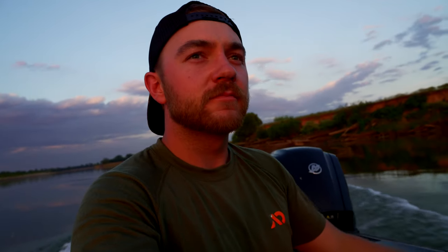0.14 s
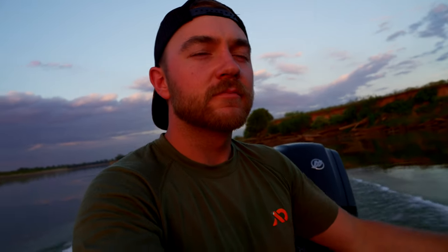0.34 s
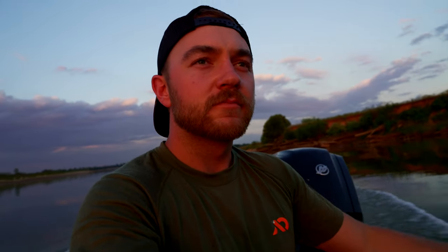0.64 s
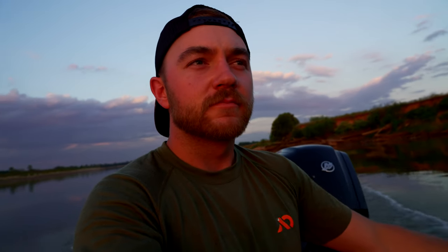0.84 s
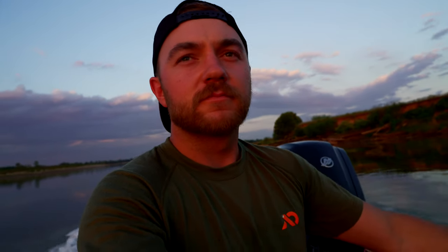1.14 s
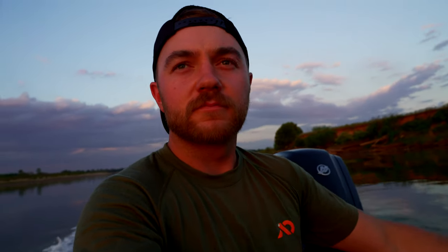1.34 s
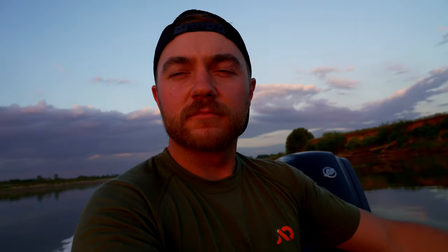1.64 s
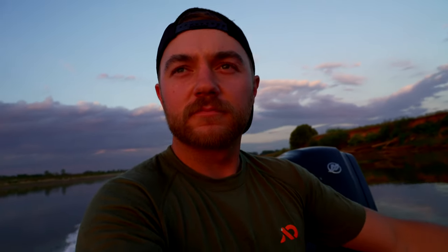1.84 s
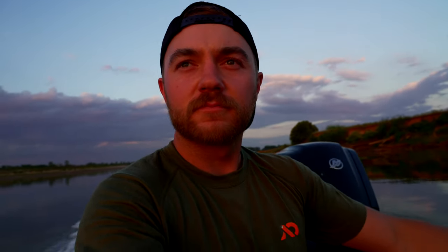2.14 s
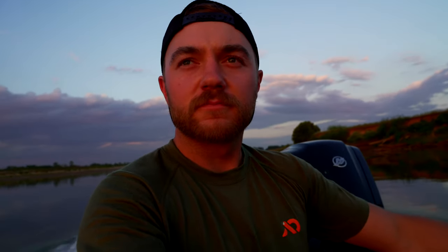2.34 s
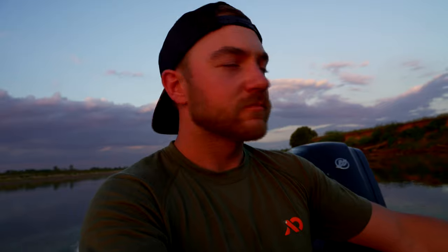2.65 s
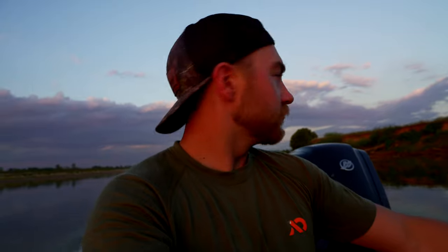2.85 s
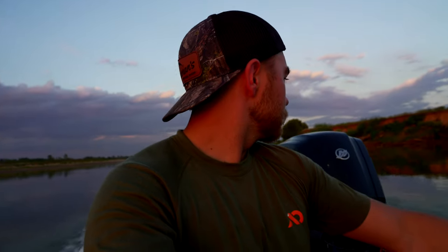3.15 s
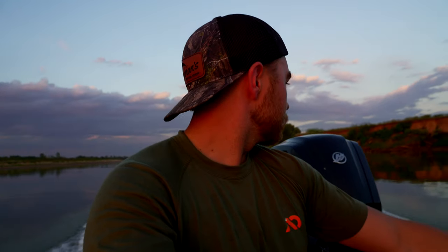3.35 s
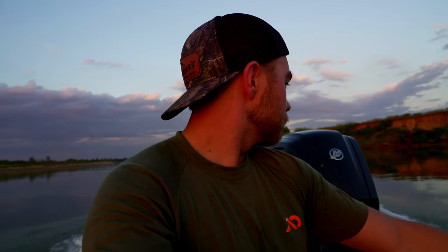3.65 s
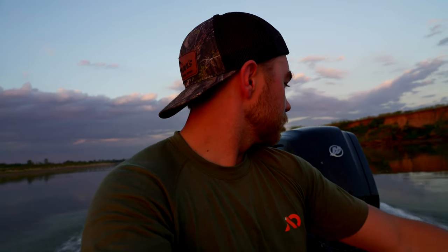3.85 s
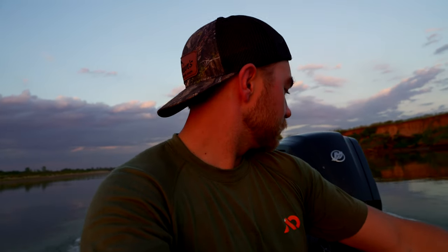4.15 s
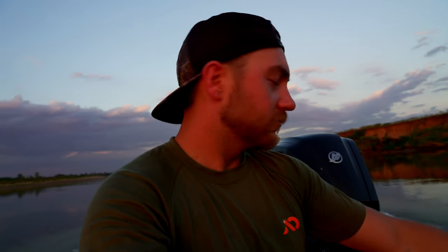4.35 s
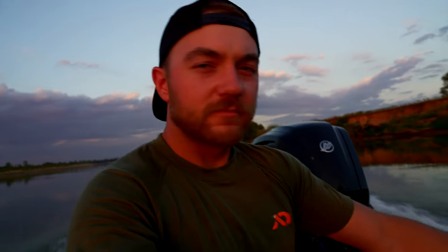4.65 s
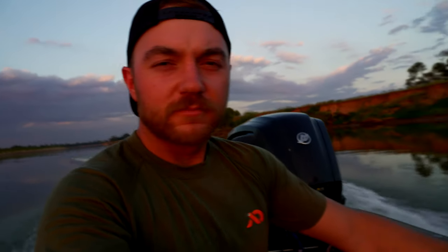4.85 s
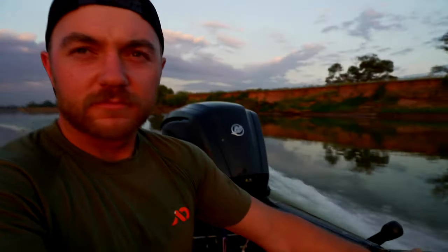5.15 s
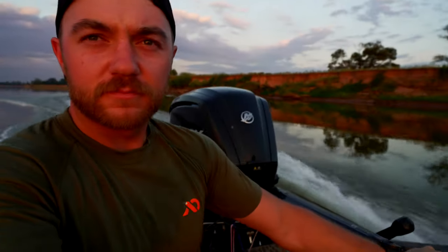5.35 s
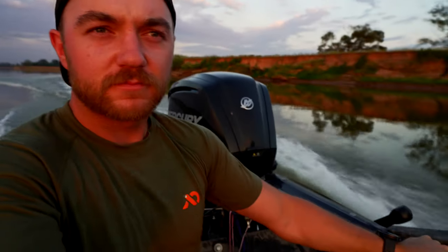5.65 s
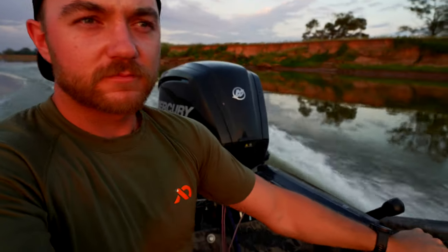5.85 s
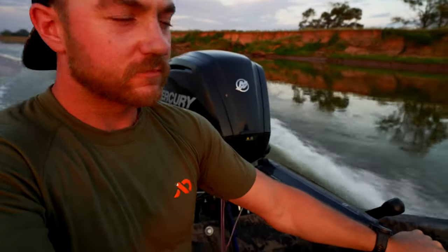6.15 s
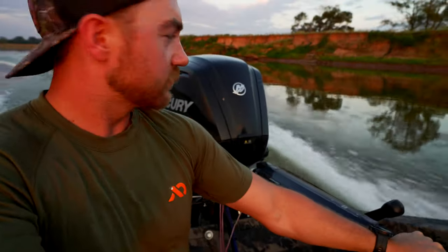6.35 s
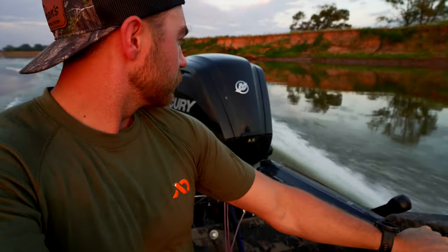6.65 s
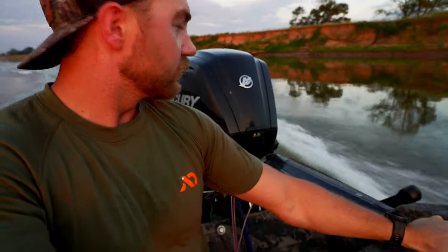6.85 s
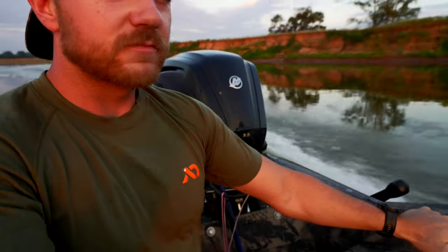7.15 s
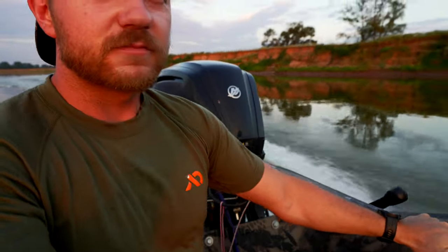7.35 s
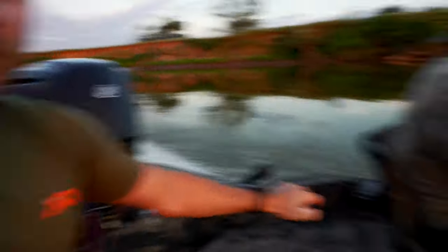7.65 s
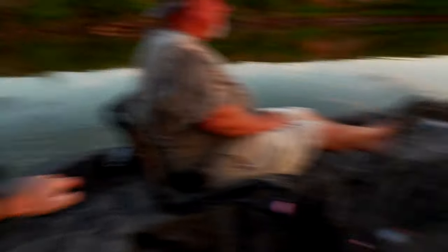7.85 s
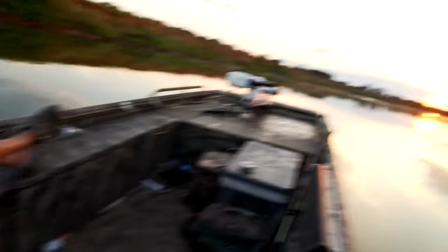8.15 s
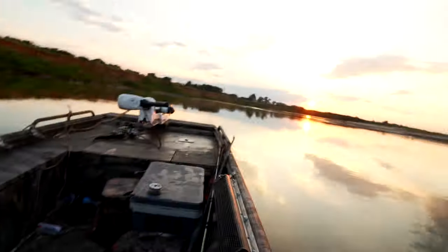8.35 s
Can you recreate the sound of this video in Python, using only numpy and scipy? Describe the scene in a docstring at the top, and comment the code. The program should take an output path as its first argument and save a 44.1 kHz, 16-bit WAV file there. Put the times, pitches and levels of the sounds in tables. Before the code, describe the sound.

Heard on board, a motorboat settles into a low cruising drone as its raspy exhaust and hissing wake grow louder.

```python
"""A boat motor drones, speeds up, eases briefly and settles at cruising speed, heard from on board.
It is a four-cylinder, four-stroke jet outboard: its firings boom in the hull and puff out a raspy exhaust.
The exhaust and the hissing wake grow louder as the microphone turns to the stern (the back).
At the end it swings to the bow (the front): the boom falls away, wind buffets it, spray hisses
and something clacks."""
import sys
import numpy as np
from scipy import signal
from scipy.fft import rfft, irfft, next_fast_len
from scipy.io import wavfile
from scipy.ndimage import uniform_filter1d, map_coordinates

SR = 44100
rng = np.random.default_rng(int(sys.argv[2]) if len(sys.argv) > 2 else 0)


def wav_out(sig):
    """Save sig, one row per channel (or a flat mono array), as 16-bit PCM at SR to the path in sys.argv[1]."""
    wavfile.write(sys.argv[1], SR, np.round(np.clip(np.atleast_2d(sig).T, -1, 1) * 32767).astype(np.int16))


N = 374850
CRUISE_HZ = 44.06  # engine cycles a second; one cycle is two turns of the crankshaft
WAKE_OPEN_AT = 0.54  # share of the turn to the stern that brings the wake into full view
BOW_OPEN_AT = 0.81  # share of the swing to the bow that brings full wind and spray
TOP_HZ = 15720


def amp(db):
    """Turns decibels (dB) into a factor to multiply by."""
    return 10 ** (np.asarray(db) / 20)


def unit(x):
    """Scales a signal to an average (rms) level of 1."""
    return x / np.sqrt(np.mean(x ** 2) + 1e-20)


def curve(rows):
    """Joins (seconds, value) points with straight lines, one value per sample."""
    times, values = np.transpose(rows)
    return np.interp(np.arange(N) / SR, times, values)


def wobble(rate):
    """A smooth curve through `rate` random values a second."""
    points = rng.standard_normal(int(N * rate / SR) + 4)
    return map_coordinates(points, [np.arange(N) * rate / SR])


def filtered(x, response):
    """Multiplies each frequency in x by response(hz)."""
    size = next_fast_len(N + SR // 2)
    return irfft(rfft(x, size) * response(np.fft.rfftfreq(size, 1 / SR)), size)[:N]


def coloured(x, spectrum):
    """Shapes the tone of x with (Hz, dB) points, then scales it to level 1."""
    freqs, db = np.transpose(spectrum)
    return unit(filtered(x, lambda hz: amp(np.interp(np.log(hz + 1), np.log(freqs), db))))


def turbulence(patchy_db):
    """Noise with random louder and softer patches across pitch and time."""
    grid = signal.stft(rng.standard_normal(N), nperseg=512)[2]
    patches = uniform_filter1d(rng.standard_normal(grid.shape), size=7, axis=0)
    patches = uniform_filter1d(patches, size=12, axis=1)
    return signal.istft(grid * amp(patchy_db * unit(patches)), nperseg=512)[1][:N]


def engine_tones(angle, tones, waver_db, rough, spread):
    """Tones at multiples of the cycle rate, shaken by uneven burning; less spread gives a sharper pulse."""
    out = np.zeros(N)
    for multiple, db in tones:
        phase = multiple * angle + rng.normal(0, spread) + rough * wobble(40)
        out += amp(db + waver_db * wobble(3.054)) * np.sqrt(2) * np.cos(phase)
    return out


def hull(angle, strain, stern, swing):
    """Four firings a cycle boom in the hull; unequal cylinders add a throb of weaker tones."""
    # The tone an octave above the boom. Each row: time in seconds, level in dB.
    octave_levels = [(0, -31.5), (0.85, -36), (1.15, -31), (1.55, -33.5), (2.25, -29.5), (3.4, -36.5),
                     (3.97, -30.5), (4.35, -29), (5.3, -33.5), (7.1, -35.5), (7.85, -38), (8.3, -31)]
    # Tones the hull carries. Each row: multiple of the cycle rate, relative level in dB.
    hull_tones = [(2, -36), (3, -37.5), (5, -36.5), (6, -39), (7, -51), (9, -51.5), (10, -48), (11, -47),
                  (13, -50.5), (14, -56), (15, -45.5)]
    # Low noise in the hull. Each row: frequency in Hz, relative level in dB.
    drone_shape = [(40, -29.5), (85, -2.5), (130, -3), (180, 2.5), (240, -2), (330, -3), (450, -9),
                   (600, -12.5), (1000, -19.5), (2000, -49)]
    boom_db = -14.5 - stern + 0.5 * strain
    # The boom is a standing wave: the swing to the bow crosses its silent spot.
    silent_at = 0.69
    standing = np.cos(np.pi / 2 * swing / silent_at)
    turned = np.clip(np.maximum(stern / WAKE_OPEN_AT, swing), 0, 1)
    overtone_db = -42.5 + 6.5 * turned - 3.5 * strain
    firing = 4 * angle
    boom = standing * amp(boom_db + 0.04 * wobble(25)) * np.cos(firing)
    octave = amp(curve(octave_levels) + 1.73 * wobble(20)) * np.cos(2 * firing + 0.17 * wobble(27))
    overtone = amp(overtone_db + 1.6 * wobble(20)) * np.cos(3 * firing + 0.055 * wobble(25))
    throb = amp(-1.4 - 3.6 * strain) * engine_tones(angle, hull_tones, waver_db=2, rough=0.19, spread=2.08)
    drone = amp(-32.5 - 0.5 * strain) * coloured(turbulence(patchy_db=1.0), drone_shape)
    return np.sqrt(2) * (boom + octave + overtone) + throb + drone


def exhaust(angle, speed, strain, stern, bow):
    """Each firing lets out a rasping puff of gas, one cylinder the strongest, along with higher tones."""
    # Noise of the gas. Each row: frequency in Hz, relative level in dB.
    rasp_shape = [(250, -26), (480, 3), (600, -4.5), (720, 1.5), (910, 3), (1050, -6), (1500, -11.5),
                  (1700, -18), (2050, -19), (2600, -26), (5000, -38)]
    # Exhaust tones, then those that buzz while the motor pulls below cruising speed.
    # Each row: multiple of the cycle rate, relative level in dB.
    exhaust_tones = [(16, -38.5), (17, -40.5), (19, -40), (20, -45.5), (21, -41.5), (23, -50.5),
                     (24, -52.5), (25, -50), (29, -59.5), (32, -59), (33, -57), (35, -56), (41, -60),
                     (42, -59), (46, -56), (56, -59), (66, -60)]
    strain_tones = [(7, -44.5), (10, -45), (11, -38.5), (14, -42), (17, -46), (29, -55), (38, -52.5),
                    (40, -54.5)]
    level_db = -42 + 10.5 * stern + 0.9 * (speed - CRUISE_HZ) + 3.5 * bow
    late = angle - np.pi / 4  # the puffs arrive half a firing after the boom
    puffs = np.exp(0.22 * np.cos(4 * late) + 0.3 * np.cos(late))
    rasp = amp(-4) * coloured(puffs * turbulence(patchy_db=1.5), rasp_shape)
    hum = amp(32.5 - 3.3 * strain) * engine_tones(late, exhaust_tones, waver_db=1.3, rough=0.13, spread=0.5)
    buzz = amp(42.5) * strain * engine_tones(late, strain_tones, waver_db=1.2, rough=0.3, spread=1.65)
    flicker_db = 1.3 * wobble(55)  # no two cycles burn alike
    return amp(level_db + flicker_db) * (rasp + hum + buzz)


def whistle(stern):
    """A thin, fluttering whistle from the motor, made of a narrow band of noise."""
    pitch_hz, width_hz = 7810, 190
    band = unit(filtered(rng.standard_normal(N), lambda hz: np.exp(-((hz - pitch_hz) / width_hz) ** 2)))
    return amp(-67.5 - 0.3 * stern + 2.6 * wobble(8)) * band


def water(speed, stern, bow):
    """The wake rushes louder with speed and fizzes with bursting droplets; the bow throws up spray."""
    # The wake's rush, its fizz and the bow's spray. Each row: frequency in Hz, relative level in dB.
    wash_shape = [(200, -7.5), (600, 5), (1400, 8), (1750, 3), (2100, 3.5), (2800, -2), (3800, -2),
                  (4500, -7), (6300, -12), (7200, -14), (9300, -17), (11000, -24.5), (16000, -34)]
    fizz_shape = [(3000, -29.5), (7000, 1), (9300, 2.5), (11300, -3.5), (12700, -1), (16000, -11.5)]
    spray_shape = [(500, -7.5), (1700, -1.5), (2600, -0.5), (4000, 0.5), (5000, -5), (7000, -13),
                   (10000, -16.5), (16000, -22.5)]
    wake_view = np.minimum(stern / WAKE_OPEN_AT, 1)
    # The jet throws more water while the engine speeds up.
    acceleration = uniform_filter1d(np.gradient(speed) * SR, size=SR // 5)
    surge_db = 1.5 * np.tanh(np.maximum(acceleration, 0) / 2.5)
    wash_db = -41.5 + 2.5 * wake_view + 0.38 * (speed - CRUISE_HZ) + surge_db
    fizz_db = -66.5 + 8.5 * wake_view + 2 * (speed - CRUISE_HZ)
    spray_db = -38 - 45 * (1 - bow) ** 2
    droplets = amp(0.6 * wobble(500) + 0.4 * wobble(25))
    wash = coloured(droplets * turbulence(patchy_db=0.56), wash_shape)
    fizz = coloured(droplets * turbulence(patchy_db=2.5), fizz_shape)
    spray = coloured(droplets * turbulence(patchy_db=2.1), spray_shape)
    return amp(wash_db) * wash + amp(fizz_db) * fizz + amp(spray_db) * spray


def wind(stern, bow):
    """Air rumbles on the microphone: sheltered towards the stern, roaring in the head wind at the bow."""
    # Puffs of air. Each row: time of the peak in seconds, length in seconds, level in dB.
    air_puffs = [(1.538, 0.2, -32.5), (2.4, 0.3, -33), (2.74, 0.14, -34), (3.24, 0.14, -29),
                 (5.42, 0.18, -39), (6.02, 0.1, -38), (6.3, 0.2, -36), (6.9, 0.5, -39), (7.68, 0.2, -34)]
    # The breeze's rumble and the head wind's roar. Each row: frequency in Hz, relative level in dB.
    rumble_shape = [(10, -17), (25, -2.5), (45, 4.5), (70, -1), (120, -24.5), (300, -29), (900, -65.5)]
    roar_shape = [(15, -25), (45, 3), (90, 2.5), (140, 1), (250, -20), (500, -17), (1200, -44),
                  (4000, -57.5)]
    t = np.arange(N) / SR
    breeze = amp(-38 - 6.5 * stern + 8 * bow ** 3 + wobble(4.8))
    puffs = sum(amp(db) * np.exp(-(2 * (t - peak) / length) ** 2) for peak, length, db in air_puffs)
    roar_db = -21.7 - 86.5 * (1 - bow) ** 2
    rumble = coloured(rng.standard_normal(N) * amp(1.4 * wobble(16)), rumble_shape)
    roar = coloured(rng.standard_normal(N) * amp(2.1 * wobble(22)), roar_shape)
    return np.hypot(breeze, puffs) * rumble + amp(roar_db) * roar


def knocks():
    """Small hard knocks in the boat: each is a dry, bright crack of noise over a brief ring."""
    # The knocks. Each row: start in seconds, level in dB, seconds for the crack to fade by 60 dB.
    hits = [(6.421, -39.5, 0.036), (8.2785, -21.5, 0.064)]
    # The crack's noise. Each row: frequency in Hz, relative level in dB.
    crack_shape = [(600, -16), (1800, -3.5), (2800, 3.5), (4500, -1), (6800, 2), (8500, -19), (15000, -22)]
    # Ringing tones. Each row: frequency in Hz, relative level in dB, seconds to fade by 60 dB.
    ring_tones = [(1750, 0, 0.1), (2940, -10, .08), (4180, 8.5, 0.069), (5900, -5.5, .045)]
    t = np.arange(N) / SR
    out = np.zeros(N)
    for start, db, fade in hits:
        age = np.maximum(t - start, 0)
        crack = amp(-60 * age / fade) * coloured(rng.standard_normal(N), crack_shape)
        ring = sum(amp(level - 60 * age / life) * np.sin(2 * np.pi * hz * age)
                   for hz, level, life in ring_tones)
        out += amp(db) * (t >= start) * (crack + amp(-11) * ring)
    return out


def scene():
    """The engine's cycle drives boom and exhaust; where the microphone faces sets the mix."""
    # Engine speed. Each row: time in seconds, cycles a second.
    engine_speed = [(0, 36.5), (0.1, 37.8), (0.26, 40.7), (0.48, 41.7), (0.66, 41.1), (0.86, 40.3),
                    (1.17, 43.5), (1.45, 44.1), (1.9, 44.2), (3.1, 43.9), (3.5, 44.2), (4.9, 43.78),
                    (6.8, 44.2), (7.15, 43.8), (7.6, 43.75), (8.5, 43.1)]
    # How openly the microphone faces motor and wake. Each row: time in seconds, share from 0 to 1.
    facing_stern = [(0, 0.05), (2.85, 0), (3.85, 0.49), (4.38, 0.45), (4.48, 0.88), (6, 0.91), (7.83, 0.95),
                    (7.97, 0.1), (8.5, 0.5)]
    # Its swing to the bow. Each row: time in seconds, share of the swing from 0 to 1.
    bow_swing = [(7.76, 0.01), (8.37, 0.98)]
    speed, stern, swing = curve(engine_speed), curve(facing_stern), curve(bow_swing)
    bow = np.minimum(swing / BOW_OPEN_AT, 1)
    angle = 2 * np.pi * np.cumsum(speed * (1 + 0.0008 * wobble(14))) / SR  # one full circle per cycle
    strain = np.clip((CRUISE_HZ - speed) / 2, 0, 1)  # 0 at cruising speed, 1 well below it
    motor = hull(angle, strain, stern, swing) + exhaust(angle, speed, strain, stern, bow) + whistle(stern)
    return (motor + water(speed, stern, bow) + wind(stern, bow) + knocks())[None]


def record(dry):
    """Cuts off the highest treble, everything above TOP_HZ."""
    return filtered(dry[0], lambda hz: hz < TOP_HZ)[None]


dry = scene()
out = record(dry)
wav_out(out)
```